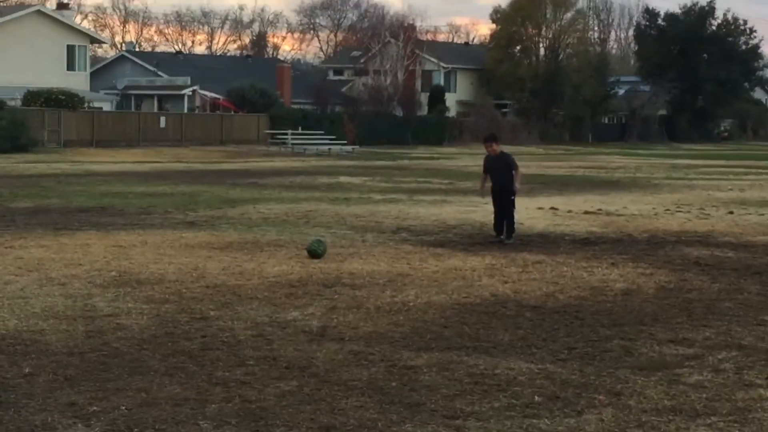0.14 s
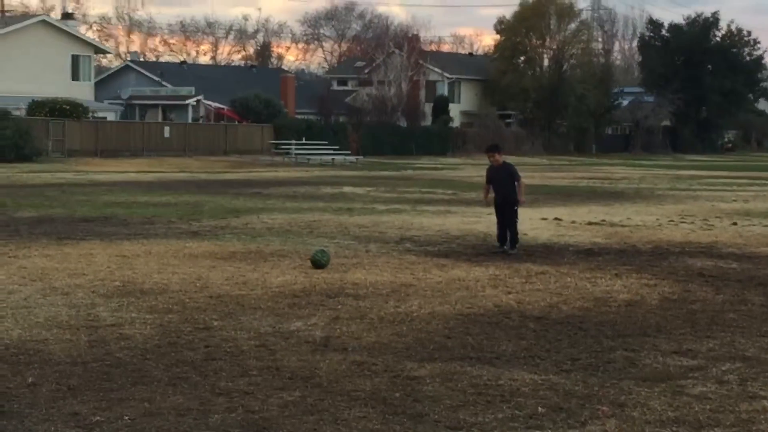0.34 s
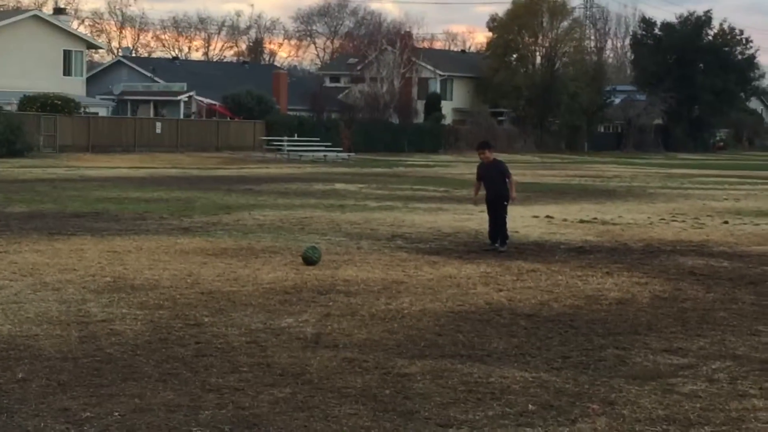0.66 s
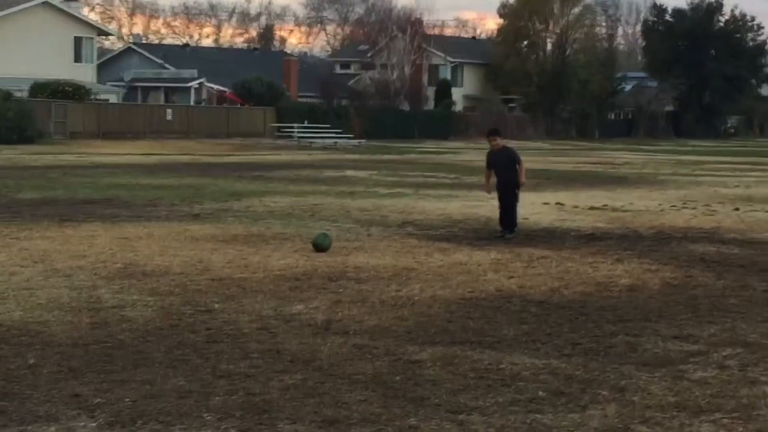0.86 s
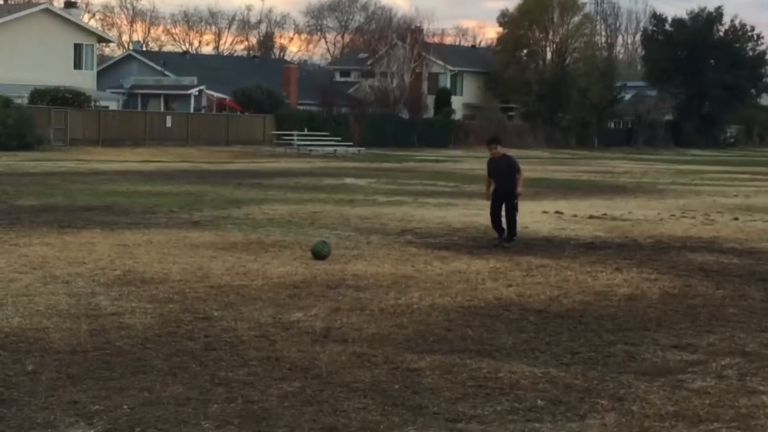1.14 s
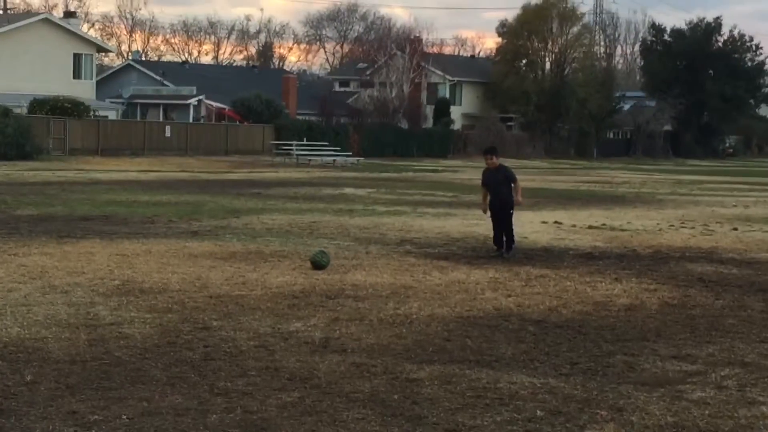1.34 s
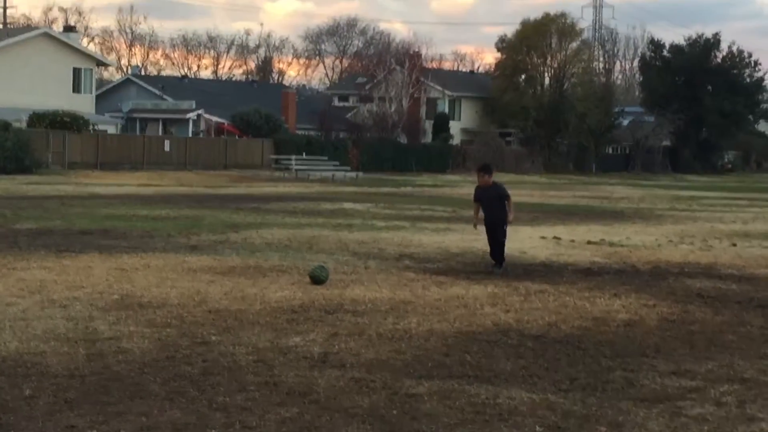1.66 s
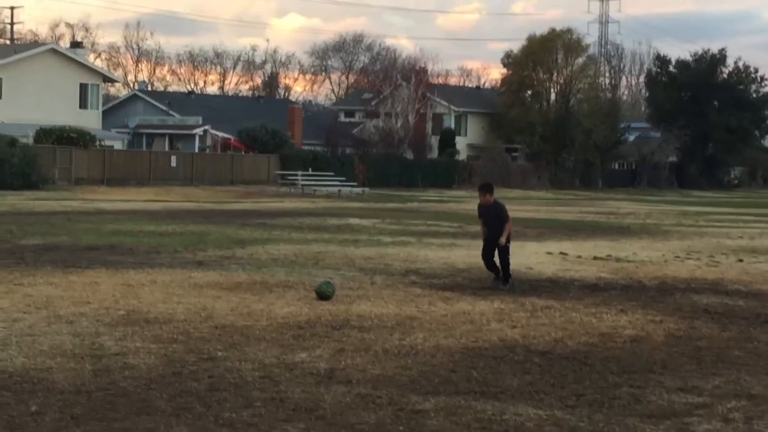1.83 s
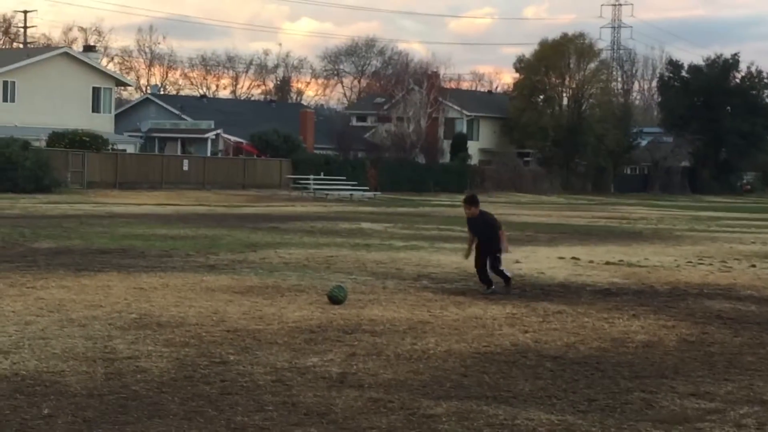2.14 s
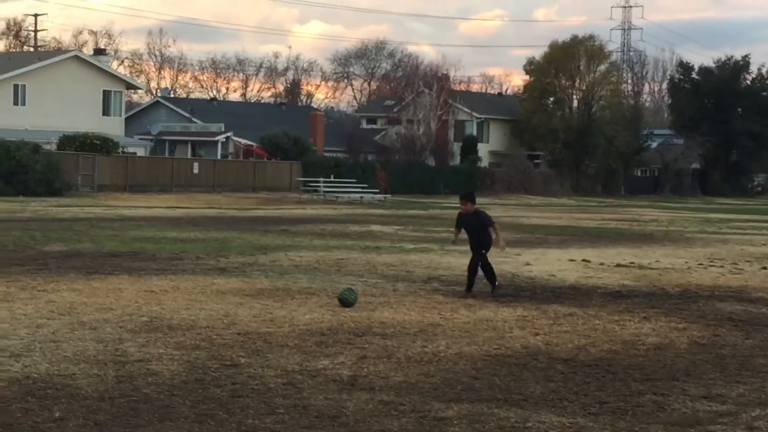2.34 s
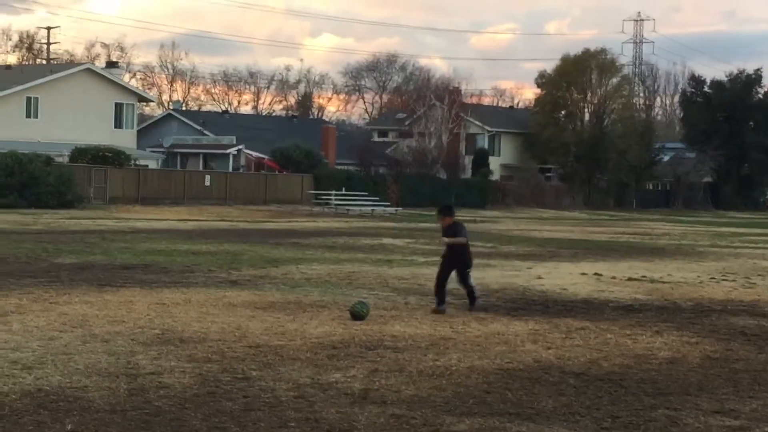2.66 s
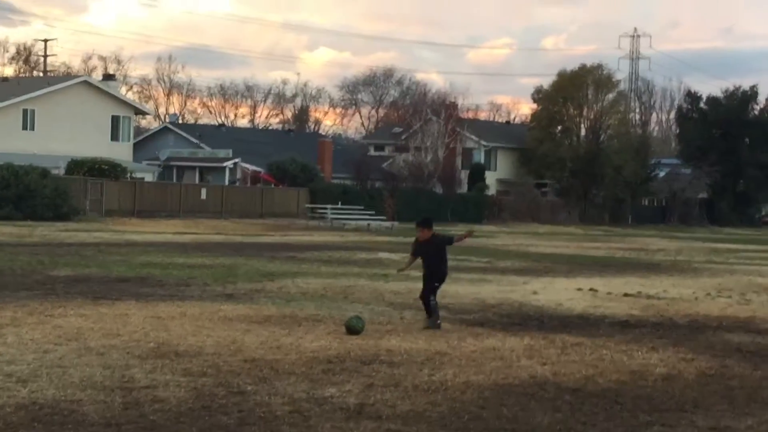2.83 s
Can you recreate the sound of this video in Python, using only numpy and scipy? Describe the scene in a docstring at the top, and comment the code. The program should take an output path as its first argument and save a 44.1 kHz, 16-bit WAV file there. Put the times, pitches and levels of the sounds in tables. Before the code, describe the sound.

A small hard knock with a brief rattle close by, over low distant traffic rumble and hum

```python
"""Far traffic rumbles and hisses beyond a grass field at dusk, under a wavering electrical hum:
the roar is shaped noise, the hum three sine partials. Close to the microphone something small
and hard is knocked and rattles on three times (contacts ringing a shell); a few light ticks ring
briefly. Two short bird chirps are arching sines; faint raspy calls from far off are narrow noise."""
import sys
import numpy as np
from scipy import signal
from scipy.io import wavfile
from scipy.ndimage import uniform_filter1d

SR = 44100
rng = np.random.default_rng(int(sys.argv[2]) if len(sys.argv) > 2 else 0)


def master(y):
    """Save y as 16-bit WAV."""
    cut = np.clip(np.atleast_2d(y).T, -1, 1)
    pcm = np.round(cut * 32767)  # scale
    wavfile.write(sys.argv[1], SR, pcm.astype(np.int16))


def gain_from_db(level_db):
    """Convert decibel levels to linear amplitude factors (20 dB per decade)."""
    decades = np.asarray(level_db, float) / 20
    return 10 ** decades


N = 131859  # samples

# close knock and its rattles: start t/s, shell level/dB, spread of contacts t/s, hollow level/dB
KNOCKS = [(1.752, -55, 0.0017, -37), (1.7528, -60, .017, -58), (1.791, -70, 0.025, -58),
          (1.839, -66.5, 0.021, -58), (1.885, -70.5, 0.02, -41.5)]
# modes of the knocked shell: f/Hz, relative level/dB, t60 t/s
SHELL_MODES = [(1500, -2.5, 0.0044), (2232, -3.5, 0.0061), (3310, 2, 0.0039), (3700, -4.5, 0.0076),
               (4540, -8, 0.0054), (5130, -6, 0.0041), (5720, -0.5, 0.0021), (6520, -1, .006),
               (7000, -0.5, 0.013), (7500, -16, 0.0058), (7600, -13, 0.0038), (8830, -6.5, 0.0018),
               (12000, -12, 0.0031), (14600, -12.5, .002)]
# light ticks: start t/s, level/dB, pitch f/Hz, t60 t/s, snap relative to the ring level/dB
TICKS = [(0.2644, -50.5, 3370, .022, -5), (0.6982, -44, 3370, 0.0047, -2), (2.9715, -47, 3200, 0.013, -16)]
# bird chirps: start t/s, level/dB, top pitch f/Hz, length t/s
CHIRPS = [(0.258, -62.5, 5340, .031), (1.93, -65.5, 5275, .026)]
# far raspy calls: start t/s, length t/s, level/dB, start f/Hz, end f/Hz, width of each resonance f/Hz
RASPS = [(0.039, 0.058, -73.5, 3540, 3500, 500), (0.092, 0.078, -72.5, 3570, 3370, 360),
         (0.286, 0.18, -80.5, 3560, 3980, 900), (1.211, 0.15, -66.5, 1615, 1574, 151),
         (1.34, .035, -60, 1610, 1620, 89), (1.21, 0.078, -79.5, 3630, 3550, 300),
         (1.291, 0.12, -77.5, 3700, 3550, 200), (1.413, .04, -78, 3400, 3350, 200)]
# electrical hum: t/s, pitch f/Hz, fundamental level/dB, octave level/dB, third partial level/dB
HUM = [(0.0, 120.3, -31.5, -64, -77), (0.48, 120.8, -34.5, -60.5, -75), (0.65, 119.7, -44, -59, -73),
       (0.77, 119.2, -32, -54.5, -71.5), (0.87, 119.2, -43, -60, -82), (0.94, 119.2, -35.5, -60.5, -69.5),
       (1.38, 119.4, -34.5, -56.5, -74), (1.4, 119.4, -40.5, -56, -72), (1.66, 121.3, -37, -70.5, -76),
       (1.84, 119.5, -55, -60.5, -75), (1.85, 119.4, -40, -67, -65), (1.97, 116.4, -47.5, -74, -78),
       (2.06, 117, -43, -62, -87), (2.11, 120.9, -38, -54, -81), (2.18, 122.2, -45, -61, -77),
       (2.2, 121.4, -48, -54.5, -72), (2.25, 120.7, -35.5, -57.5, -78), (2.59, 120.1, -31, -54, -75.5),
       (2.7, 120.9, -44, -59.5, -68), (2.85, 116.7, -34.5, -56.5, -78), (2.86, 115.1, -60, -68, -79),
       (2.99, 115.1, -35.5, -69, -68)]
# spectrum of far traffic and air: f/Hz, relative density level/dB
AIR_SPECTRUM = [(20, -23), (40, -29.5), (70, 2), (105, 3.5), (150, -7.5), (210, -10), (300, -22.5),
                (420, -35), (650, -33.5), (1000, -30), (1600, -38), (2200, -42.5), (2800, -48), (4500, -52),
                (6500, -53.5), (9500, -55.5), (10500, -59.5), (12000, -57), (14800, -60), (15500, -57.5)]
# drift of the far roar: t/s, change of the middle level/dB, change of the treble level/dB
ROAR_DRIFT = [(0, -0.5, 2.5), (.3, 0, 0.5), (.6, -1, -0.5), (.9, 0, 1), (1.2, 1.5, 2), (1.5, 0, 1),
              (1.801, 1, 1.5), (2.1, -0.5, 0), (2.4, -1, 0), (2.7, -0.5, 0), (3, 2, 1)]

CONTACTS_PER_S, SOFT_HZ = 11000, 13000  # mean contact rate, lowpass of the contacts
SPOT_DB = 6  # largest random lift of a shell mode
GRIT_DB = 0  # bare contacts beside the ringing shell
HOLLOW_HZ, HOLLOW_T60_S, THUD_STRETCH = 500, 0.014, 1.6  # the stretch adds to t60, per s of spread
PUSH_LAG_S = 0.0022
CRACK_AT_S, CRACK_S, CRACK_HZ, CRACK_DB = 1.7519, 0.0022, (2300, 9200), -46.5
TICK_RISE_S, TICK_UPPER, TICK_UPPER_DB = 0.001, 1.14, -3.5  # second mode: pitch ratio, relative level
SNAP_HZ, SNAP_T60_S = (1800, 7000), 0.0067
CHIRP_ARCH_HZ, CHIRP_TOP_AT = 400, 0.45  # fall half a length from the top, place of the top (0 to 1)
CHIRP_FLUTTER_DB, CHIRP_FLUTTER_HZ = 2.2, 300  # rms, fastest
RASP_EDGE_S = 0.012
HUM_WAVER_DB, HUM_WAVER_HZ = 1, 7.6  # rms, fastest
AIR_DB, PATCHY_DB, SWELL_DB, SWELL_HZ = -41.5, 2, 0.87, 3  # overall rms, patch rms, swell rms, fastest
MIDDLE_HZ, TREBLE_HZ = 900, 3200  # centres of the drifting bands, each about an octave either way


def evened(x):
    """Scales a signal to rms 1."""
    return x / np.sqrt(np.mean(x ** 2) + 1e-20)


def add(mix, s, sound):
    """Adds a sound into the mix in place from s seconds on, cut at the end."""
    part = mix[round(s * SR):][:len(sound)]
    part += sound[:len(part)]


def slow(top_hz, t):
    """Random wandering of rms 1: sines of random phase over the decade below top_hz."""
    wander = 0
    for f in np.geomspace(top_hz / 10, top_hz, 20):
        wander = wander + np.sin(2 * np.pi * (f * t + rng.random())) / np.sqrt(f)
    return evened(wander)


def resonate(x, hz, width):
    """Moving resonance of gain 1: shifts hz down to zero, smooths, and shifts back."""
    turn = np.exp(2j * np.pi * np.cumsum(hz) / SR)
    r = np.exp(-np.pi * width / SR)
    return 2 * (turn * signal.lfilter([1 - r], [1, -r], x / turn)).real


def ring(hz, t60):
    """One mode dying by 60 dB in t60 seconds."""
    t = np.arange(2048) / SR
    return gain_from_db(-60 * t / t60) * np.sin(2 * np.pi * hz * t)


def knock(s, db, spread, hollow_db):
    """Tiny contacts ring the shell, each cluster at another spot; a softer push rings the hollow inside."""
    t, draws = np.arange(2048) / SR, rng.random((2048, 3))
    happens = draws[:, 0] < CONTACTS_PER_S / SR
    strength = 2 * draws[:, 1] - 1
    swell = np.sin(np.pi * np.minimum(t / spread, 1) ** 0.75)
    contacts = signal.lfilter(*signal.butter(2, SOFT_HZ, fs=SR), happens * strength * swell)

    modes = 0
    for k, (hz, level, t60) in enumerate(SHELL_MODES):
        # neighbouring modes alternate in sign
        modes = modes + (-1) ** k * gain_from_db(level + SPOT_DB * draws[k, 2]) * ring(hz, t60)
    sound = np.convolve(contacts, modes)
    add(sound, 0, gain_from_db(GRIT_DB) * np.diff(contacts))
    # level is the rms as if all energy fell within the spread and 2 ms more
    sound *= gain_from_db(db) / np.sqrt(np.sum(sound ** 2) / (SR * (spread + 0.002)) + 1e-20)

    hollow = ring(HOLLOW_HZ, HOLLOW_T60_S + THUD_STRETCH * spread)
    push = np.minimum(t / (0.3 * spread), 1)
    add(sound, PUSH_LAG_S, gain_from_db(hollow_db) * hollow * push)
    return s, sound


def crack():
    """The hard broad first contact of the knock: a brief burst of band-passed noise."""
    t = np.arange(0, CRACK_S, 1 / SR)
    grit = signal.lfilter(*signal.butter(4, CRACK_HZ, "band", fs=SR), rng.standard_normal(len(t)))
    burst = grit * np.sin(np.pi * np.sqrt(t / CRACK_S))
    return CRACK_AT_S, gain_from_db(CRACK_DB) * evened(burst)


def tick(s, db, hz, t60, snap_db):
    """A dull snap of noise and a short ring of two modes."""
    t = np.arange(2048) / SR
    grit = signal.lfilter(*signal.butter(2, SNAP_HZ, "band", fs=SR), rng.standard_normal(len(t)))
    snap = gain_from_db(snap_db - 60 * t / SNAP_T60_S) * grit
    ringing = ring(hz, t60) + gain_from_db(TICK_UPPER_DB) * ring(TICK_UPPER * hz, t60)
    return s, gain_from_db(db) * np.minimum(t / TICK_RISE_S, 1) * (ringing + snap)


def chirp(s, db, top_hz, length):
    """A sine whose pitch arches up and down as its fluttering level swells and fades."""
    u = np.arange(0, length, 1 / SR) / length
    hz = top_hz - CHIRP_ARCH_HZ * ((u - CHIRP_TOP_AT) / 0.5) ** 2
    level = gain_from_db(db + CHIRP_FLUTTER_DB * slow(CHIRP_FLUTTER_HZ, u * length))
    return s, level * np.sin(np.pi * u ** 0.87) * np.sin(2 * np.pi * np.cumsum(hz) / SR)


def rasp(s, length, db, start_hz, end_hz, width):
    """A far raspy call: noise through a steep gliding resonance."""
    t = np.arange(0, length, 1 / SR)
    hz = start_hz + (end_hz - start_hz) * t / length
    noise = rng.standard_normal(SR // 2)[:len(t)]
    voice = evened(resonate(resonate(noise, hz, width), hz, width))
    edges = np.clip(np.minimum(t, length - t) / RASP_EDGE_S, 0, 1)
    return s, gain_from_db(db) * edges * voice


def hum():
    """A low tone and its partials, wavering as the air bends their path."""
    t, (s, hz, db, octave_db, third_db) = np.arange(N) / SR, np.transpose(HUM)
    turn = 2 * np.pi * (np.cumsum(np.interp(t, s, hz)) / SR + rng.random())
    waver_db = HUM_WAVER_DB * slow(HUM_WAVER_HZ, t)
    low = gain_from_db(np.interp(t, s, db) + waver_db) * np.sin(turn)
    octave = gain_from_db(np.interp(t, s, octave_db)) * np.sin(2 * turn)
    third = gain_from_db(np.interp(t, s, third_db)) * np.sin(3 * turn)
    return np.sqrt(2) * (low + octave + third)  # levels are rms


def air():
    """Far traffic and air: random short-time spectra with drifting patches and a slow swell."""
    frames, hz = N // 512 + 5, np.fft.rfftfreq(2048, 1 / SR)
    t = np.arange(frames) * 512 / SR
    real, imag, patches = rng.standard_normal((frames, len(hz), 3)).T
    patches = uniform_filter1d(patches, size=4, axis=0)  # across frequency
    patches = evened(uniform_filter1d(patches, size=8, axis=1))  # across time

    f, level = np.transpose(AIR_SPECTRUM)
    shape = np.interp(np.log(hz + 1), np.log(f + 1), level)[:, None]
    s, middle_db, treble_db = np.transpose(ROAR_DRIFT)
    for centre_hz, db in ((MIDDLE_HZ, middle_db), (TREBLE_HZ, treble_db)):
        octaves = np.log2((hz[:, None] + 1) / centre_hz)
        shape = shape + np.exp(-octaves ** 2) * np.interp(t, s, db)

    swell_db = SWELL_DB * slow(SWELL_HZ, t)
    spectra = (real + 1j * imag) * gain_from_db(shape + PATCHY_DB * patches + swell_db)
    roar = signal.istft(spectra, nperseg=2048, noverlap=1536)[1][:N]
    return gain_from_db(AIR_DB) * evened(roar)


def scene():
    """The field at one microphone: steady roar and hum, then every event at its time."""
    mix = air() + hum()
    for source, rows in ((knock, KNOCKS), (tick, TICKS), (chirp, CHIRPS), (rasp, RASPS)):
        for row in rows:
            add(mix, *source(*row))
    add(mix, *crack())
    return mix[None]


def top_cut(x):
    """Nothing passes above the cut-off."""
    return signal.sosfilt(signal.butter(12, 15760, fs=SR, output="sos"), x)


def record(dry):
    """Passes on the finished mix of the single microphone."""
    return top_cut(dry)


dry = scene()
out = record(dry)
master(out)
```